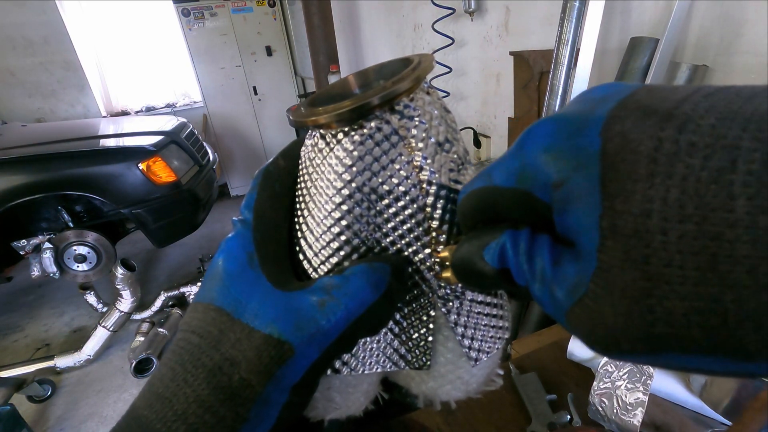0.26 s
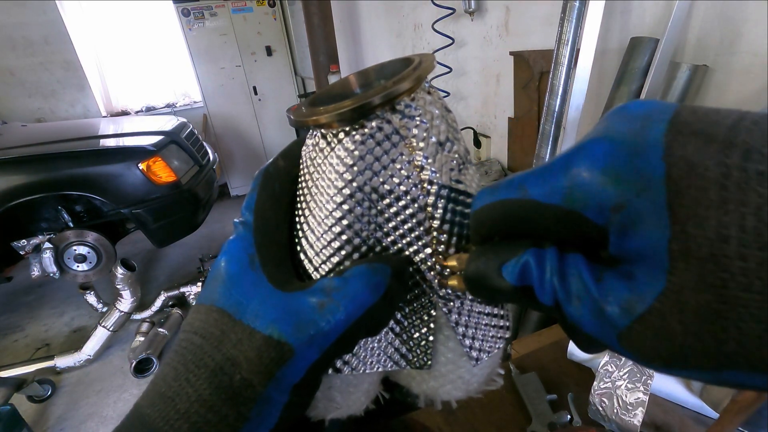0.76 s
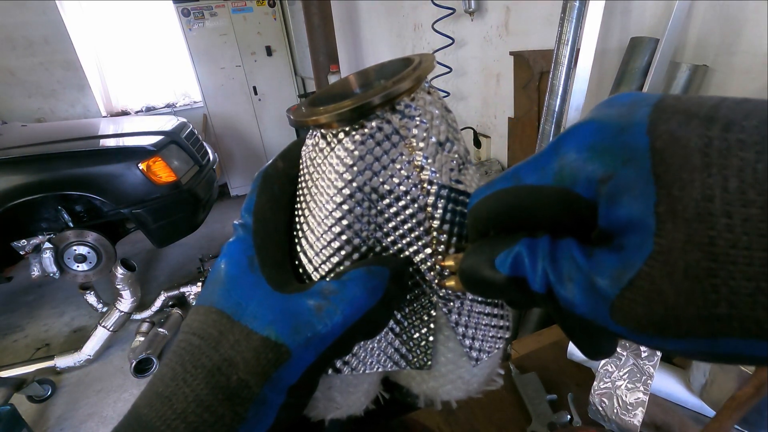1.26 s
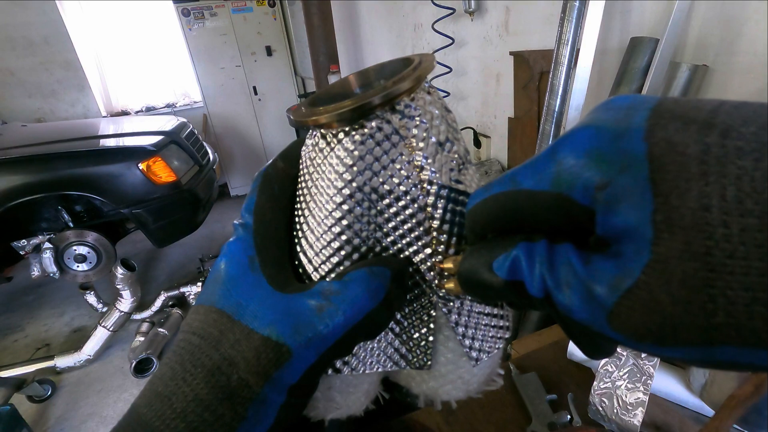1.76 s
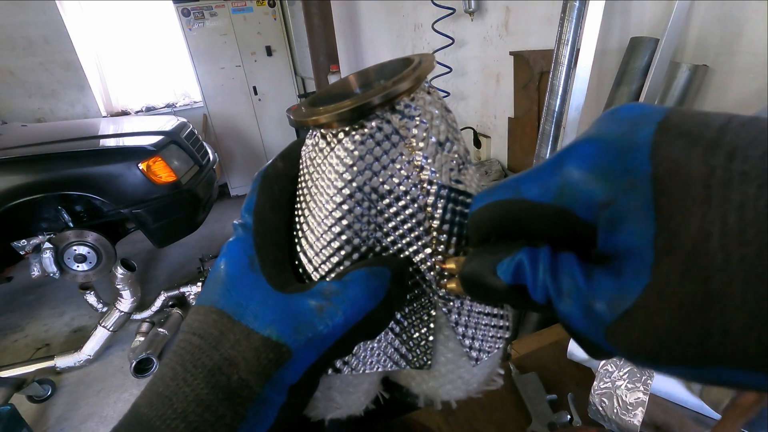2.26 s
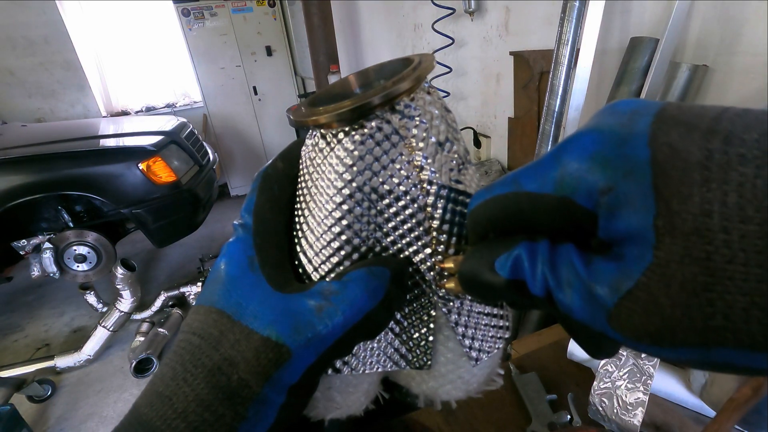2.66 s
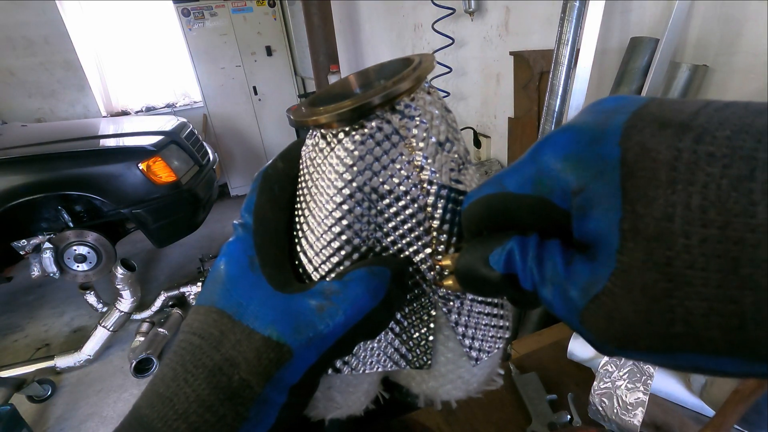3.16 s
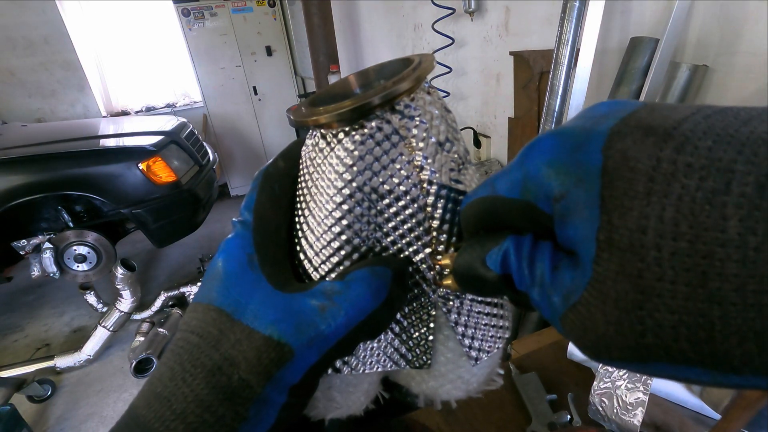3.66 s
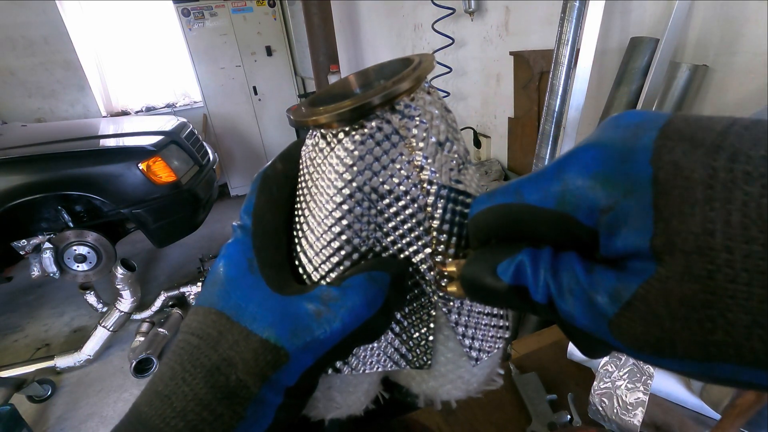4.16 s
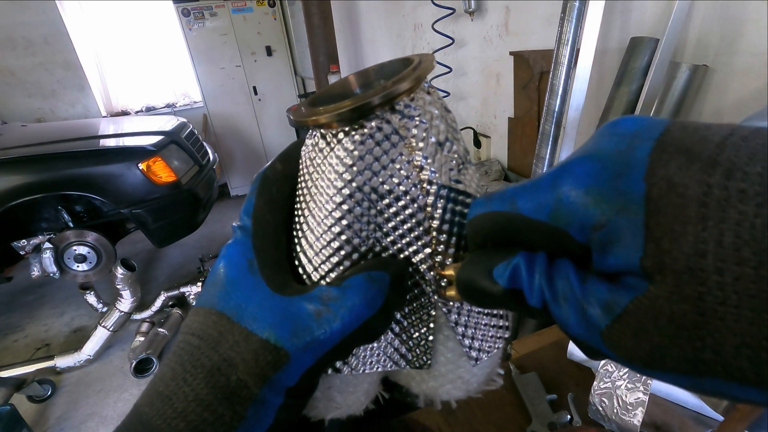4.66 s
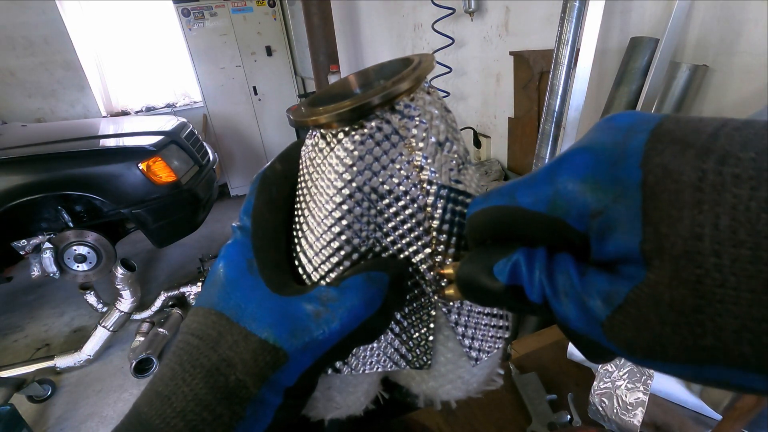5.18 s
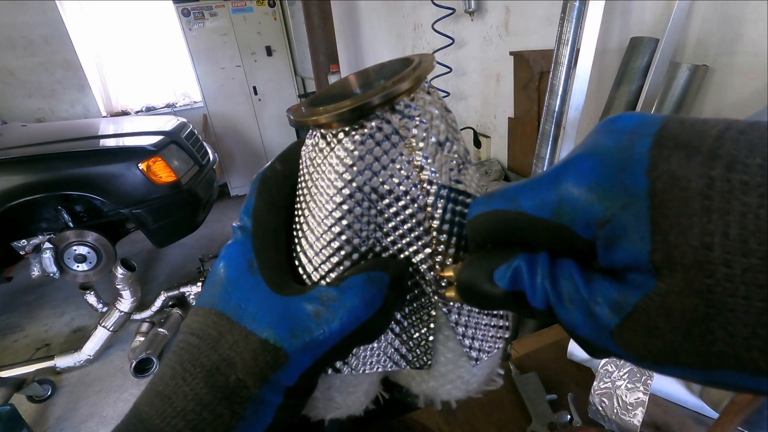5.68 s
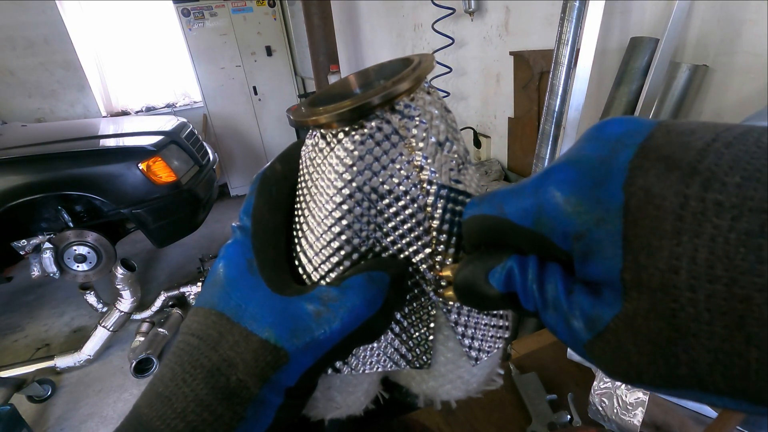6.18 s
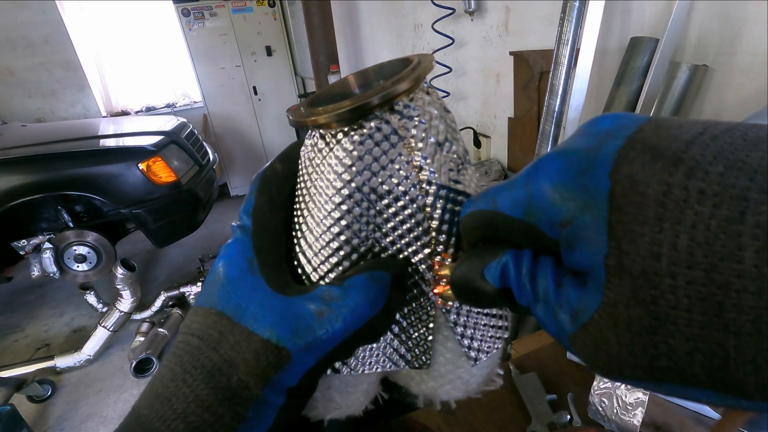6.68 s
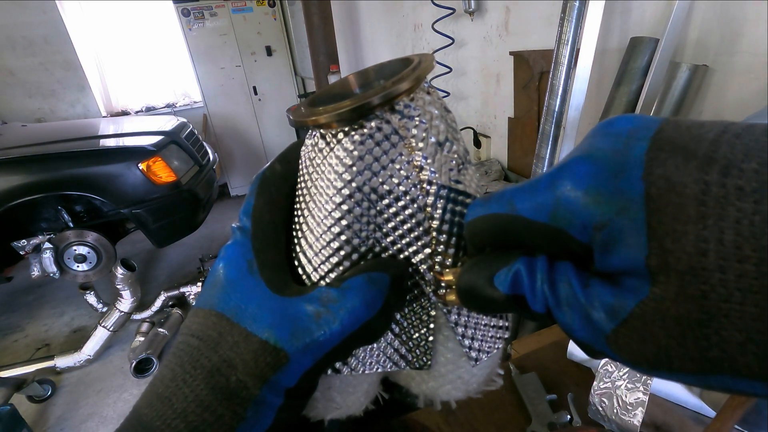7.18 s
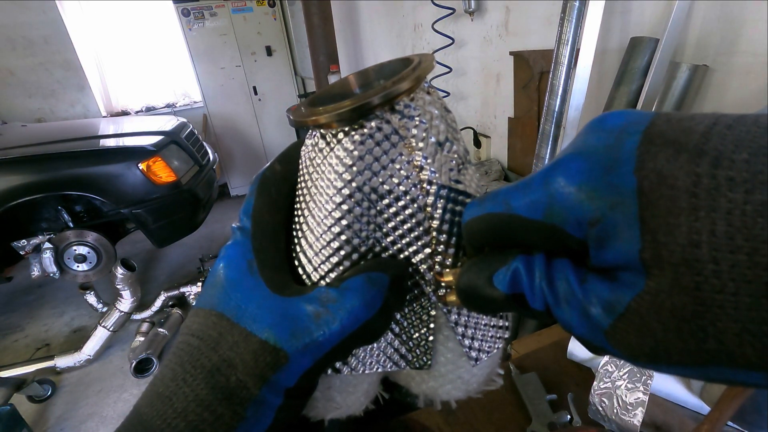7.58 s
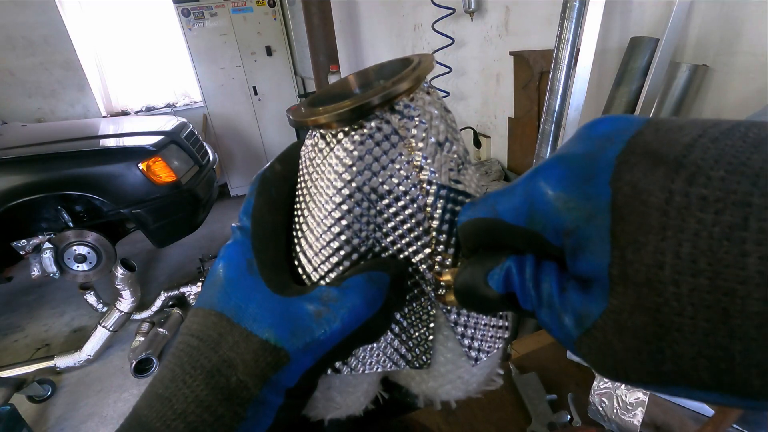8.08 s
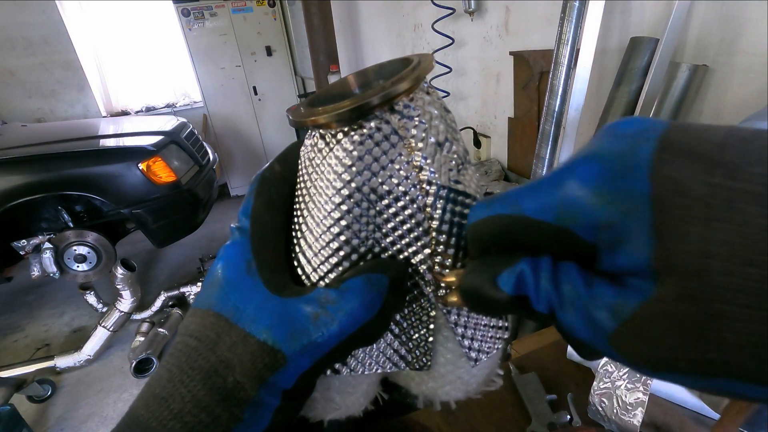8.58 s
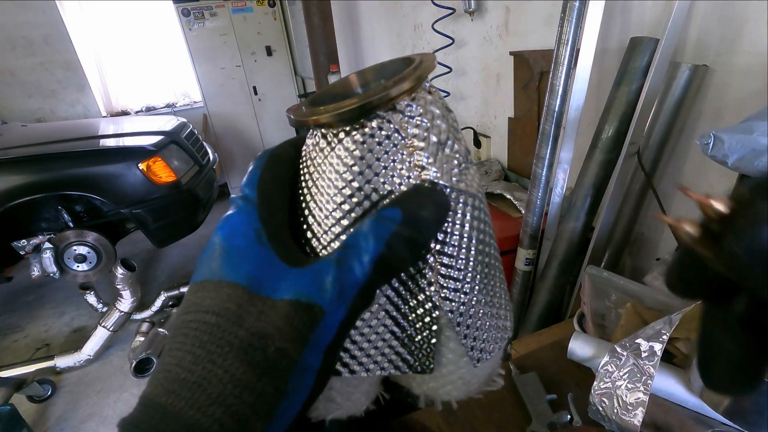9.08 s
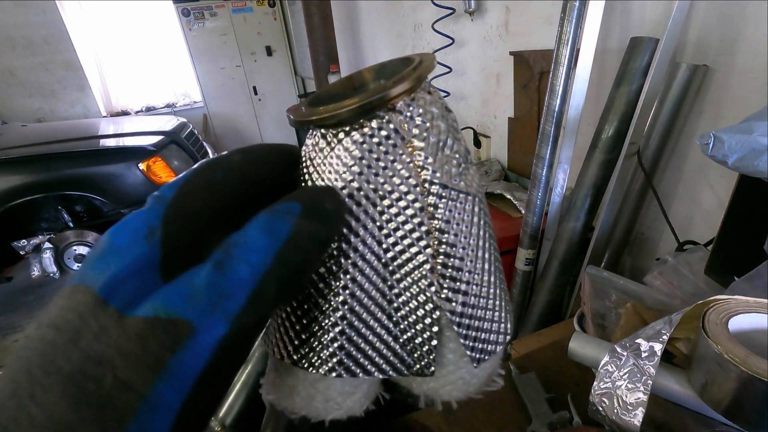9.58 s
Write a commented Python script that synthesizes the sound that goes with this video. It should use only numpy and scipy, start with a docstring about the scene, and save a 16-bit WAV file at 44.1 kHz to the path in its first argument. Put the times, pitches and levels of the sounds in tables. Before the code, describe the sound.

A foot switch clunks down and up around crisp electric weld snaps on a foil-wrapped pipe, then gloved hands grab and turn it noisily.

```python
"""In a workshop, steel foil is spot-welded onto an exhaust pipe, close to a microphone on a camera mount.
Four times the welder's foot switch clacks down, the weld snaps, and the switch clacks back up; it also taps.
Gloved hands knock the wrapped pipe and crinkle the foil; at the end they grab it and turn it.
Metal parts are sums of dying sine waves; rubs, foil and air are shaped noise. Taps, clacks and snaps add
their own echoes; most of the hands' sounds pass through a room reverberation; the hollow rubs stay dry."""
import sys
import numpy as np
from scipy import signal
from scipy.fft import rfft, irfft
from scipy.io import wavfile
from scipy.ndimage import map_coordinates

SR = 44100
rng = np.random.default_rng(int(sys.argv[2]) if len(sys.argv) > 2 else 0)


def master(y):
    """Save y as 16-bit WAV."""
    cut = np.clip(np.atleast_2d(y).T, -1, 1)
    pcm = np.round(cut * 32767)  # scale
    wavfile.write(sys.argv[1], SR, pcm.astype(np.int16))


N = 433944  # length in samples
T = np.arange(SR) / SR  # time within one blow (s)
CLOCK = np.arange(N) / SR  # time within the whole scene (s)


def amp(db):
    """Turn decibels into a gain."""
    return 10 ** (np.asarray(db) / 20)


def unit(x):
    """Scale a sound to an average strength (rms) of 1."""
    return x / np.sqrt(np.mean(x ** 2) + 1e-20)


def along(points, hz):
    """Read (f/Hz, value) points at any pitch, on a log pitch axis."""
    f, v = np.transpose(points)
    return np.interp(np.log(hz + 1), np.log(f + 1), v)


def colour(x, points):
    """Filter with the given spectrum shape, never acting early; white noise keeps its power."""
    size = 4096
    # folding the cepstrum gives a filter that answers as promptly as possible
    cepstrum = irfft(np.log(amp(along(points, np.fft.rfftfreq(size, 1 / SR)))))
    cepstrum[1:size // 2] *= 2
    cepstrum[size // 2 + 1:] = 0
    response = irfft(np.exp(rfft(cepstrum)))
    return signal.fftconvolve(x, response / np.linalg.norm(response))[:len(x)]


def butter(x, order, hz, kind="low"):
    """Keep what lies below hz (kind low) or above it (kind high)."""
    return signal.sosfilt(signal.butter(order, hz, kind, fs=SR, output="sos"), x)


def fade(t60):
    """Free decay that falls by 60 dB in t60 seconds."""
    return 1000 ** (-T / t60)


def burst(t60):
    """White noise that dies away."""
    return rng.standard_normal(SR) * fade(t60)


def ring(modes, scatter_db, sign=-1):
    """Add up dying sines at newly drawn strengths; each next one is also multiplied by sign once more."""
    total = np.zeros(SR)
    for k, (hz, db, t60) in enumerate(modes):
        strength = sign ** k * amp(db + scatter_db * rng.normal())
        total += strength * fade(t60) * np.sin(2 * np.pi * hz * T)
    return total


def add(track, s, sound):
    """Mix a sound in at time s."""
    part = track[round(s * SR):][:len(sound)]
    part += sound[:len(part)]


def wobble(rate):
    """A smooth random curve with rate knots a second."""
    knots = rng.standard_normal(int(N * rate / SR) + 4)
    return map_coordinates(knots, [np.arange(N) * rate / SR])


def swell(s, half):
    """A smooth rise and fall about time s."""
    return np.exp(-.5 * ((CLOCK - s) / half) ** 2)


def swells(rows):
    """Loudness curve of several movements (middle, level, half-length)."""
    return sum(amp(db) * swell(s, half) for s, db, half in rows)


# how long the workshop echoes: f/Hz, t60/s
ECHO_TIMES = [(200, 1), (530, 0.9), (1400, 0.9), (4500, 0.71), (7000, 0.63), (12000, 0.46)]


def tail():
    """A fresh spread-out echo of the workshop, starting near rms 1; the treble dies first."""
    hz, t, z = signal.stft(rng.standard_normal(SR), SR, nperseg=256)
    dying = z * 1000 ** (-t / along(ECHO_TIMES, hz)[:, None])
    return signal.istft(dying, SR, nperseg=256)[1][:SR]


def in_room(x, wet_db):
    """A near sound plus its reverberation, which builds up as the walls answer."""
    echo = tail() * (1 - fade(0.013))
    return x + amp(wet_db) * signal.fftconvolve(x, echo / np.linalg.norm(echo))[:len(x)]


# spectrum shape of the workshop air: f/Hz, level/dB
AIR_COLOUR = [(15, -38.5), (25, -17), (96, -14), (202, -1.5), (243, -4), (292, -7.5), (391, -5), (458, -5),
              (717, -5), (840, -10.5), (1010, -10), (1430, -10), (4330, -20.5), (8600, -38.5),
              (13800, -63.5)]
AIR_DB = -58.5


def air():
    """The steady air of the workshop is shaped noise."""
    return amp(AIR_DB) * colour(rng.standard_normal(N), AIR_COLOUR)


# the arms shift against the camera: middle t/s, level/dB, half-length t/s
ARM_SHIFTS = [(3.38, -60, 0.26), (9.35, -54.5, 0.11), (9.83, -66, 0.042)]
SWAY_REST_DB = -75.5  # arms held still


def sway():
    """Moving arms rumble softly through the camera mount."""
    shape = [(20, -5.5), (60, -3.0), (120, -2.5), (200, 1.0), (500, -29), (2000, -75)]
    rumble = colour(rng.standard_normal(N), shape)
    return (amp(SWAY_REST_DB) + swells(ARM_SHIFTS)) * unit(rumble * amp(1.67 * wobble(12.0)))


def crinkle(rate, clump_hz, clump_db, rub):
    """Tiny slips over a steady rub, bunched as the dimples catch and let go; rms 1."""
    slips = (rng.random(N) < rate / SR) * rng.standard_normal(N)
    friction = unit(slips) + rub * rng.standard_normal(N)
    return unit(friction * amp(clump_db * np.tanh(wobble(clump_hz))))


# the gloves creep while the tip is placed: middle t/s, level/dB before the common gain, half-length t/s
GLOVE_CREEPS = [(.09, -63, .08), (.28, -50.5, 0.19), (2.09, -56, 0.042), (2.42, -57.5, 0.36),
                (3.44, -52.5, 0.15), (5.75, -60.5, 0.14), (6.38, -57, 0.26), (8.1, -56, 0.19)]


def shifts(gain_db, glove_db):
    """Gloves creep on the embossed foil while the tip is placed."""
    foil = crinkle(rate=1800, clump_hz=57.05, clump_db=12.5, rub=0.44)
    foil = colour(foil, [(80, -19.5), (400, -1.5), (1000, 0.0), (2500, -3.5), (5000, -12.0),
                         (8000, -24.5), (11500, -30.5), (15000, -53)])
    glove = colour(rng.standard_normal(N), [(40, -10.5), (90, -35.5), (220, -5.0), (480, 1.5),
                                            (900, -31.0), (3000, -44.5)])
    creep = swells(GLOVE_CREEPS) * (foil + amp(glove_db) * glove)
    return in_room(amp(gain_db) * creep, wet_db=1.5)


# hollow rubs and thin squeaks: middle t/s, level/dB, half-length t/s, f/Hz at the middle,
# glide [Hz per s], reach of the band to each side f/Hz
RUB_BANDS = [(0.282, -57.5, .035, 4230, -4, 45), (2.21, -55, 0.12, 471.6, -0.5, 130),
             (2.497, -55.5, 0.14, 456.6, -100, 130), (8.863, -39.5, 0.051, 804, -300, 55.3),
             (9.716, -30, 0.011, 1594, -2000, 160), (9.757, -27, 0.054, 910, 0, 70)]


def hollow():
    """Each rub is a narrow band of noise that swells and fades; most glide in pitch."""
    out = np.zeros(N)
    for s, db, half, hz, glide, reach_hz in RUB_BANDS:
        phase = 2 * np.pi * np.cumsum(hz + glide * (CLOCK - s)) / SR
        # two slow noises on a cosine and a sine make a band around the moving pitch
        a, b = butter(rng.standard_normal((2, N)), 2, reach_hz)
        out += amp(db) * swell(s, half) * unit(a * np.cos(phase) + b * np.sin(phase))
    return out


# a glove or the tip slides over the embossed foil: middle t/s, level/dB, half-length t/s, f/Hz of the patch
FOIL_SLIDES = [(0.111, -48, 0.0096, 5100), (0.835, -54, 0.025, 2400), (2.163, -47, 0.012, 2460),
               (2.468, -51.5, 0.034, 3000), (2.607, -60, 0.0085, 2492), (4.101, -29, 0.003, 2000),
               (4.118, -33, 0.003, 2600), (4.473, -36.5, 0.0045, 2900), (5.011, -47.5, 0.0066, 2670),
               (5.035, -49, 0.0098, 2960), (5.382, -51.5, 0.047, 2600), (5.425, -51, .008, 5500),
               (5.432, -45, 0.004, 2400), (7.052, -35.5, 0.0054, 3800), (7.033, -35.5, 0.0036, 1900),
               (7.102, -38, 0.0041, 2800), (9.036, -33.5, 0.014, 2450), (9.07, -34.5, .008, 2320),
               (9.207, -39, 0.019, 2360), (9.247, -36, 0.0081, 2200), (9.619, -31, 0.015, 3030),
               (9.681, -28, 0.012, 1710), (9.707, -27, 0.0025, 1600), (9.722, -25.5, 0.015, 1510),
               (9.766, -26.5, 0.006, 1980), (9.789, -17, 0.0032, 2130)]
# spectrum shape of rubbed foil, also used in turning and knocks: f/Hz, level/dB
FOIL_COLOUR = [(50, -41.5), (150, -10.5), (400, 0.5), (900, -7.5), (1500, -5), (2400, -5), (3500, -8),
               (5000, -12.5), (7000, -19), (8500, -33.5), (11500, -28.5), (15000, -64)]


def scuffs(width, ring_db):
    """Each slide is a run of small slips that swells and fades, ringing the patch of foil that it touches."""
    grain = colour(crinkle(rate=2200, clump_hz=220, clump_db=5, rub=0.6), FOIL_COLOUR)
    out = np.zeros(N)
    for s, db, half, hz in FOIL_SLIDES:
        patch = signal.lfilter(*signal.iirpeak(hz, 1 / width, fs=SR), grain)  # width relative to the pitch
        out += amp(db) * swell(s, half) * unit(grain + amp(ring_db) * patch)
    return in_room(out, wet_db=-9.0)


GRAB_ATTACK_S, FOIL_RELEASE_S, PIPE_RELEASE_S = 0.011, 0.13, 0.017


def grip(s, hold, release):
    """Loudness of one grab: a quick rise, then a fall that starts hold seconds after s."""
    t = CLOCK - s
    return np.clip(t / GRAB_ATTACK_S, 0, 1) * np.exp(-np.maximum(t - hold, 0) / release)


# the hands grab and turn the pipe: start t/s, hold t/s, foil level/dB, pipe level/dB (before common gains)
HAND_GRABS = [(8.867, 0.15, -36.5, -40.5), (9.1, 0.19, -40, -30), (9.396, 0.026, -46, -46),
              (9.457, 0.028, -31, -37), (9.639, 0.06, -34.5, -22.5), (9.69, 0.074, -48, -19),
              (9.767, 0.023, -63, -10)]
# tones of the wrapped pipe, also used in knocks: f/Hz, level/dB, t60/s before any damping by the grip
PIPE_MODES = [(193, -12, .15), (250, -2.5, .15), (276, -4, .17), (314, -3.5, .16), (368, -7, .1),
              (434, 2, .15), (505, -10, .08), (590, -7, .1), (655, -7, .08), (730, -9, .09),
              (795, -12, .08), (916, 0, .11), (1008, -7, .1), (1168, -7, .08), (1270, -10, .07),
              (1422, -6, .11), (1850, 0, .07), (2029, -3, .06), (2220, 0, .05), (2374, 5, .07),
              (2850, 3, .06)]
PIPE_SCATTER_DB = 2.5  # the tones vary in strength from one use to the next


def turning(foil_db, pipe_db):
    """The hands crush the foil and drag on the pipe, which rumbles."""
    crush = sum(amp(db + foil_db) * grip(s, hold, FOIL_RELEASE_S) for s, hold, db, _ in HAND_GRABS)
    pull = sum(amp(db + pipe_db) * grip(s, hold, PIPE_RELEASE_S) for s, hold, _, db in HAND_GRABS)
    foil = colour(crinkle(rate=1800, clump_hz=70, clump_db=3, rub=0.85), FOIL_COLOUR)
    drag = signal.fftconvolve(rng.standard_normal(N), ring(PIPE_MODES, PIPE_SCATTER_DB))[:N]
    drag = unit(colour(drag, [(30, -10), (100, -5.0), (190, 10.5), (250, 7.5), (330, 5.5),
                              (450, -5.5), (900, -8.5), (1500, -23), (4000, -70)]))
    return in_room(crush * foil + pull * drag, wet_db=-7.0)


# knocks on the pipe: t/s, level/dB, cut-off f/Hz (low through a padded glove, high on bare metal)
PIPE_KNOCKS = [(0.895, -13, 1170), (0.909, -27, 920), (1.217, -34, 323), (1.625, -40, 289),
               (1.719, -32.5, 290), (1.771, -46, 300), (2.359, -24.5, 580), (4.0997, -13.5, 1160),
               (4.115, -22.5, 800), (5.433, -41, 324), (6.352, -28.5, 322), (6.952, -43.5, 290),
               (7.034, -21, 810), (7.047, -24, 610), (7.957, -29, 330), (8.077, -40, 600), (8.61, -34, 293),
               (8.669, -29.5, 303), (9.469, -28, 700), (9.516, -37, 290), (9.654, -29, 260),
               (9.686, -15, 273), (9.738, -19, 700), (9.7748, -5.5, 960), (9.7854, -13, 1310),
               (9.789, -6, 560), (9.8189, -5, 560)]
# how well the pipe sends out each pitch: f/Hz, level/dB
PIPE_RADIATION = [(40, -46), (100, -26), (170, -5), (260, 0), (330, 1), (440, 0), (560, -3), (900, 0),
                  (2000, 3), (6000, -4)]
THUD_DB = 10  # dull thud of the wrapping, relative to the pipe's tones
KNOCK_RISE_S = .02  # the wrapping gives way under a knock
GRIP_T60 = .26  # the gripping hand damps the pipe (s)


def knocks(thud_t60, scuff_db, scuff_t60, wet_db):
    """Soft contacts reach only the low tones of the pipe; harder ones also scuff the foil more."""
    out = np.zeros(N)
    for s, db, hz in PIPE_KNOCKS:
        # the tones start together in phase; a mild factor weakens the higher ones on top of their listed levels
        body = ring(PIPE_MODES, PIPE_SCATTER_DB, sign=0.91) + amp(THUD_DB) * burst(thud_t60)
        body *= (1 - fade(KNOCK_RISE_S)) * fade(GRIP_T60)
        body = colour(butter(body, 3, hz), PIPE_RADIATION)
        scuff = amp(scuff_db) * hz / 1000 * colour(burst(scuff_t60), FOIL_COLOUR)
        add(out, s, amp(db) * in_room(body / np.abs(body).max() + scuff, wet_db))
    return out


# light taps of the switch, mostly shortly before a clack, and bounces: t/s, level/dB
SWITCH_TAPS = [(0.226, -33.5), (3.5707, -23.5), (4.158, -21), (4.374, -30.5), (6.477, -26.5), (8.1692, -23),
               (8.7, -20.5), (8.826, -21.5)]
# spectrum shape of a tap: f/Hz, level/dB
TAP_COLOUR = [(35, -29), (100, -26.5), (230, -12), (620, -8.5), (790, -3), (940, -2), (1200, -5),
              (1500, -16), (3000, -14), (3400, -17.5), (4400, -18), (5400, -22.5), (6400, -23), (8500, -36),
              (10300, -33.5), (12500, -46), (15000, -70)]
# steel parts of the switch, also used in clacks: f/Hz, level/dB, t60/s
STEEL_MODES = [(795, -9, .6), (916, -5, .55), (1008, -5, .55), (1164, -10, .5), (1415, -11, .5),
               (2340, -10, .5), (2460, -6, .5), (4226, -4, .55), (4270, -4, .55), (4463, -2, .5),
               (4640, 0, .6), (4872, -1.5, .55), (4947, -2, .5), (5089, -4, .5), (5426, -7, .45),
               (5647, -8, .5), (5868, -9, .45), (6476, -11, .45), (7900, -18, .4), (10280, -17, .35),
               (11400, -23, .3)]
# the tapped treadle of the switch, also used in clacks: f/Hz, level/dB, t60/s
TREADLE_MODES = [(905, 0, .14), (1010, -4, .16), (1170, -9, .12), (1430, -15, .12), (1690, -10, .12),
                 (2030, -15, .1), (2374, -11, .09), (2965, -9, .12), (3790, -14, .12), (4230, -21, .2),
                 (5350, -22, .05)]


def taps(direct_db, direct_t60, room_db, steel_db, treadle_db):
    """A light tap on the switch is a noise burst with room echo that rings the steel and the treadle."""
    out = np.zeros(N)
    for s, db in SWITCH_TAPS:
        blow = amp(direct_db) * burst(direct_t60) + amp(room_db) * tail()
        steel = amp(steel_db) * ring(STEEL_MODES, scatter_db=3.5)
        add(out, s, amp(db) * colour(blow + steel, TAP_COLOUR))
        add(out, s, amp(db + treadle_db) * ring(TREADLE_MODES, scatter_db=2.0))
    return out


# the switch snaps down; the first row is a light, bright tap before the first clack:
# t/s, level/dB, housing level/dB, spring level/dB, top level/dB
DOWN_BLOWS = [(0.239, -45, 9, -14, 12), (0.377, -14, 4, -2.5, 1.5), (3.6172, -18, -0.5, 2, 0.5),
              (6.5485, -15, 1, -1.5, 1), (8.2428, -18, -1.5, 2.5, 0)]
# the switch springs back: t/s, level/dB, housing level/dB, spring level/dB, top level/dB
UP_BLOWS = [(0.9088, -18.5, -2.5, 0.5, 0.5), (4.2537, -17.5, 3, 2, 2), (7.1766, -20.5, 5, 2.5, 3.5),
            (8.7606, -18.5, 5, 1, 1)]
# spectrum shape of the down blows: f/Hz, level/dB
DOWN_COLOUR = [(35, -48), (100, -21), (220, -5), (620, -13.5), (950, -4.5), (1200, -10.5), (1380, -14),
               (1500, -9), (1650, -5), (2000, -5), (2400, -2), (2800, -5.5), (3200, -8.5), (3500, -7.5),
               (3750, -5), (4200, 4), (4750, 2.5), (5500, 1), (6400, 0), (7350, -15.5), (8000, -13.5),
               (8900, -18.5), (10300, -16), (12500, -26), (15000, -61)]
# spectrum shape of the up blows: f/Hz, level/dB
UP_COLOUR = [(35, -60), (100, -45), (200, -30), (620, -5.5), (800, -4), (1300, -1), (1800, -11.5),
             (2500, -7), (3200, -8.5), (3600, -1), (4300, 0.5), (4750, 6), (6000, 1.5), (7300, -11),
             (8700, -22), (11500, -20), (15000, -50)]
STEEL_DB = -21.5  # ringing steel in a clack


def clacks(rows, spectrum, direct_db, direct_t60, room_db, treadle_db, direct_low_db):
    """The switch is out of direct sight: a clack mixes a dulled direct burst, room echo and ringing metal."""
    out = np.zeros(N)
    for s, db, housing_db, spring_db, top_db in rows:
        # each blow stresses the housing's and the spring's resonance differently
        stress = [(700, 0), (1000, housing_db), (1500, 0.0015), (2400, housing_db), (3200, 0),
                  (3750, -spring_db), (4750, spring_db), (5500, 0.0014), (8000, top_db)]
        tone = [(hz, level + along(stress, hz)) for hz, level in spectrum]
        # low pitches bend round obstacles more easily
        direct = colour(burst(direct_t60), [(2000, direct_low_db), (5000, 0.01)])
        blow = colour(amp(direct_db) * direct + amp(room_db) * tail(), tone)
        steel = amp(STEEL_DB) * ring(STEEL_MODES, scatter_db=2.0)
        treadle = amp(treadle_db) * ring(TREADLE_MODES, scatter_db=5.0)
        add(out, s, amp(db) * (blow + steel + treadle))
    return out


# spectrum shape of a weld's pressure pulse: multiple of its pitch, level/dB
CRACK_COLOUR = [(.02, -49), (.1, -24), (.28, -8), (.41, -6.5), (.53, -9), (.72, 0.5), (.92, -2), (1.22, 2),
                (1.52, -9), (2, -10.5), (2.5, -28.5), (3.3, -24.5), (4.5, -45)]


def crack(hz, fizz_db, fizz_t60):
    """The metal flashes: one pressure pulse with a brief fizz behind it; peak 1."""
    click = T == 0
    pulse = colour(click + amp(fizz_db) * burst(fizz_t60), [(k * hz, db) for k, db in CRACK_COLOUR])
    return pulse / np.abs(pulse).max()


def flex(hz, t60):
    """A patch of foil flips and swings briefly; peak 1."""
    bend = np.sin(2 * np.pi * hz * T) * fade(t60) * (1 - fade(0.00055))
    return bend / np.abs(bend).max()


# the weld snaps at the tip: t/s, level/dB, f/Hz
WELD_SNAPS = [(0.7207, -13, 3750), (0.73, -17.5, 3780), (0.7803, -17, 3340), (0.7829, -0.5, 3580),
              (3.939, -15.5, 3250), (3.9468, -9, 3560), (6.8687, -8.5, 3400), (8.5408, -12, 2980),
              (8.55, -22.5, 2130)]
# a patch of foil buckles: t/s, level/dB, f/Hz, t60/s
FOIL_BUCKLES = [(4.594, -32.5, 2180, 0.0039), (5.0338, -29, 1400, 0.0064), (5.4336, -17, 3170, 0.0022),
                (6.8691, -23.5, 1360, 0.017), (8.992, -23.5, 2320, 0.012), (9.018, -26, 1300, 0.013),
                (9.039, -21, 2400, 0.012), (9.074, -25, 2520, 0.0087), (9.179, -21, 2350, 0.0099),
                (9.202, -23, 2130, 0.0081), (9.2378, -23, 2180, 0.0061), (9.384, -20, 1720, 0.0075),
                (9.415, -32, 1970, 0.0098), (9.679, -18, 1690, .014), (9.705, -18, 1400, 0.012),
                (9.7745, -16, 2060, 0.017), (9.786, -9, 2000, 0.015), (9.8178, 0.5, 2130, 0.013),
                (9.82, -3, 2700, 0.0073)]
# the tip ticks over a dimple: t/s, level/dB, f/Hz
TIP_TICKS = [(0.1241, -28.5, 4600), (1.082, -37, 3000), (1.271, -40.5, 6500), (2.01, -44.5, 4060),
             (2.078, -42, 6200), (2.099, -39.5, 6060), (2.173, -34.5, 5840), (2.733, -48, 4270),
             (2.933, -45, 4270), (6.157, -42.5, 4270), (9.424, -29.5, 6700)]
# the wrapped foil rings briefly after every kick: f/Hz, level/dB, t60/s
SHEET_MODES = [(700, -11, 0.017), (1060, -14, 0.0098), (1440, -3.5, 0.0096), (2320, 6.5, 0.015),
               (3600, -10, .007), (4615, 8.5, 0.008), (6500, -20.5, .005)]
# spectrum shape of the spit: f/Hz, level/dB
SPIT_COLOUR = [(35, -41), (120, -42), (500, -3.5), (1200, 2), (2500, -2), (4500, 1), (7000, -10),
               (11000, -21), (15000, -27)]
WELD_SPIT_DB, BUCKLE_SPIT_DB, TICK_SPIT_DB = -17.5, -17, -7  # noise relative to the kick
TICK_T60, TICK_SHEET_DB = 0.0037, -26  # a tick is brief (s) and barely rings the sheet


def snaps(spit_t60, rattle_db, rattle_t60, sheet_db, weld_sheet_db, room_db):
    """A weld, buckle or tick kicks the foil and rings the sheet, with a short spit, a rattle and the room."""
    kicks = []
    for s, db, hz in WELD_SNAPS:
        kicks.append((s, db, hz, crack(hz, fizz_db=-19.5, fizz_t60=.006), WELD_SPIT_DB, weld_sheet_db))
    for s, db, hz, t60 in FOIL_BUCKLES:
        kicks.append((s, db, hz, flex(hz, t60), BUCKLE_SPIT_DB, sheet_db))
    for s, db, hz in TIP_TICKS:
        kicks.append((s, db, hz, flex(hz, TICK_T60), TICK_SPIT_DB, TICK_SHEET_DB))
    room_colour = [(35, -49.5), (100, -11.5), (300, 3.0), (1000, 2.0), (1800, -4.5), (4800, -3.0),
                   (7500, -15.5), (11000, -23.5), (15000, -46.5)]
    out = np.zeros(N)
    for s, db, hz, kick, spit_db, ring_db in kicks:
        sheet = amp(ring_db) * butter(ring(SHEET_MODES, scatter_db=2.5), 1, min(hz, SR / 4))
        near = butter(kick + sheet, 2, 400, "high")  # a small patch sends out little bass
        noise = burst(spit_t60) + amp(rattle_db) * burst(rattle_t60)
        spit = amp(spit_db) * colour(noise, SPIT_COLOUR)
        room = colour(tail() * (1 - fade(0.095)), room_colour)
        add(out, s, amp(db) * (near + spit + amp(room_db) * room))
    return out


def scene():
    """All sources over the steady air of the workshop, alike in both channels."""
    background = air() + sway()
    hands = shifts(gain_db=-5.5, glove_db=-10.0) + hollow() + scuffs(width=1.0, ring_db=9)
    hands += turning(foil_db=-5.0, pipe_db=-9.0)
    hands += knocks(thud_t60=0.14, scuff_db=-21.5, scuff_t60=0.029, wet_db=-13.5)
    switch = taps(direct_db=-11.0, direct_t60=0.026, room_db=-15.5, steel_db=-41, treadle_db=-12)
    switch += clacks(DOWN_BLOWS, DOWN_COLOUR, direct_db=-13.5, direct_t60=0.051,
                     room_db=-11.0, treadle_db=-18, direct_low_db=26)
    switch += clacks(UP_BLOWS, UP_COLOUR, direct_db=-8.5, direct_t60=0.042,
                     room_db=-10.0, treadle_db=-16.5, direct_low_db=13)
    welding = snaps(spit_t60=0.015, rattle_db=-10.5, rattle_t60=0.065, sheet_db=-17.5,
                    weld_sheet_db=-30, room_db=-36.5)
    return np.tile(background + hands + switch + welding, (2, 1))


# spectrum shape of the faint treble-heavy noise, drawn separately for each channel: f/Hz, level/dB
NOISE_COLOUR = [(30, 0), (120, -22), (4000, -6.5), (8000, -9.5), (12000, 1.5), (14000, -9)]
NOISE_DB = -84.5
TOP_HZ = 14000


def record(dry):
    """Deep bass and one narrow treble band are weakened, faint noise joins, peaks saturate, the top is cut."""
    x = signal.lfilter(*signal.iirnotch(9080, 13, fs=SR), dry)
    x = x - 0.29 * butter(x, 1, 110)
    x = x + amp(NOISE_DB) * np.array([colour(noise, NOISE_COLOUR) for noise in rng.standard_normal((2, N))])
    x = x / (1 + np.abs(x) ** 8) ** (1 / 8)  # loud peaks bend smoothly towards 1
    return butter(x, 24, TOP_HZ)


dry = scene()
out = record(dry)
master(out)
```